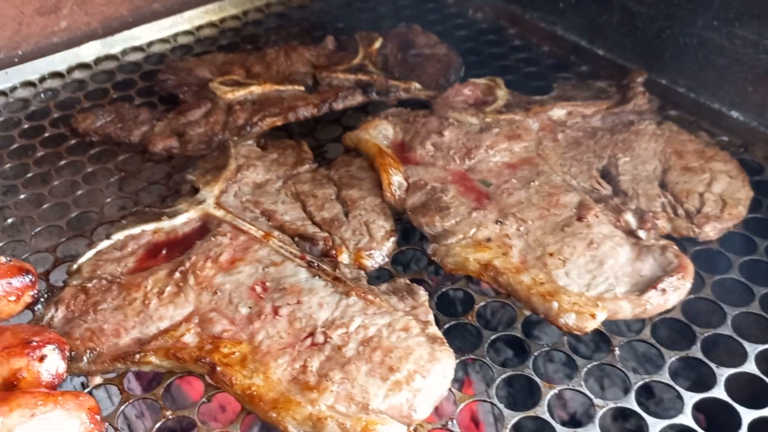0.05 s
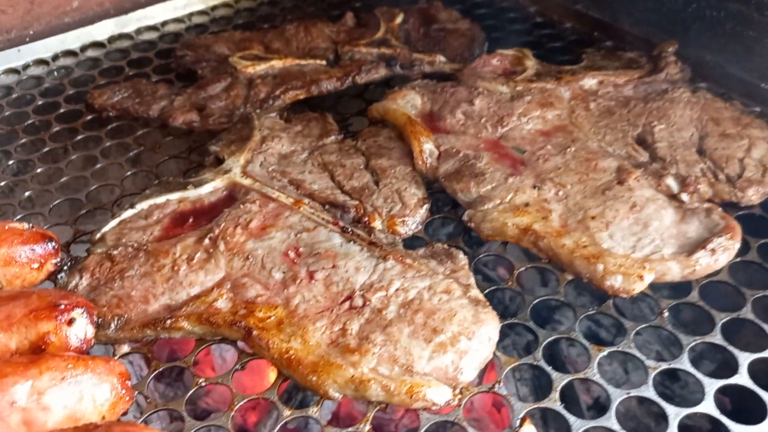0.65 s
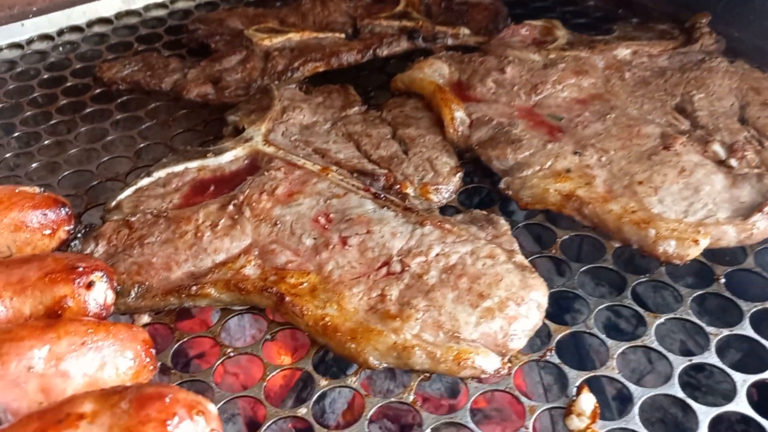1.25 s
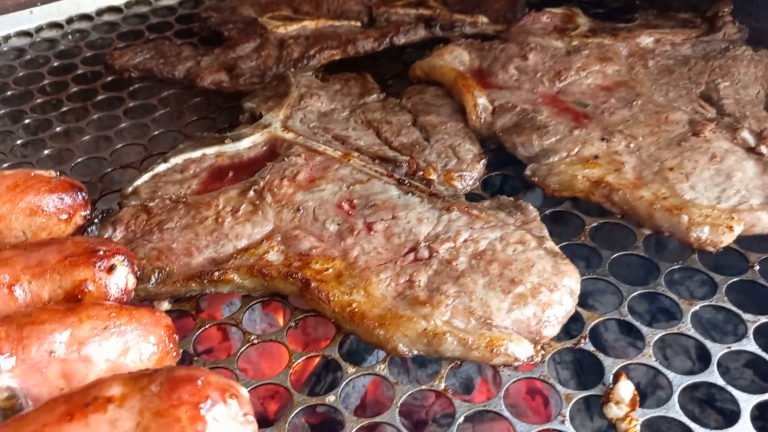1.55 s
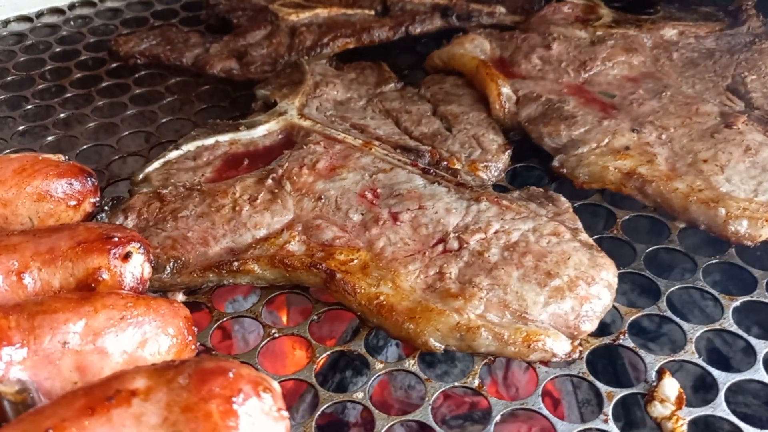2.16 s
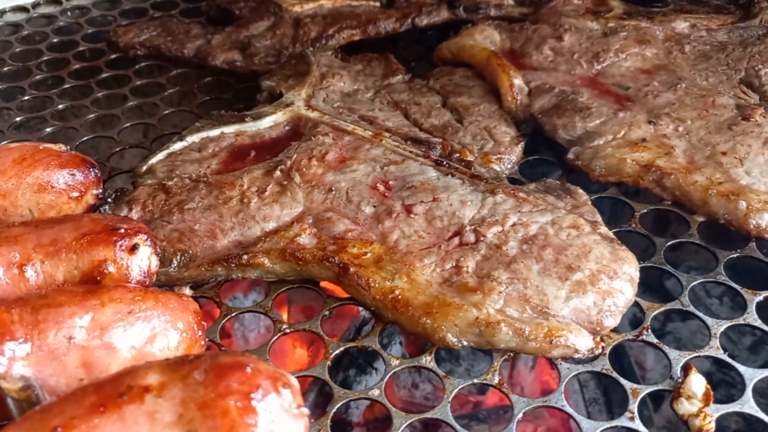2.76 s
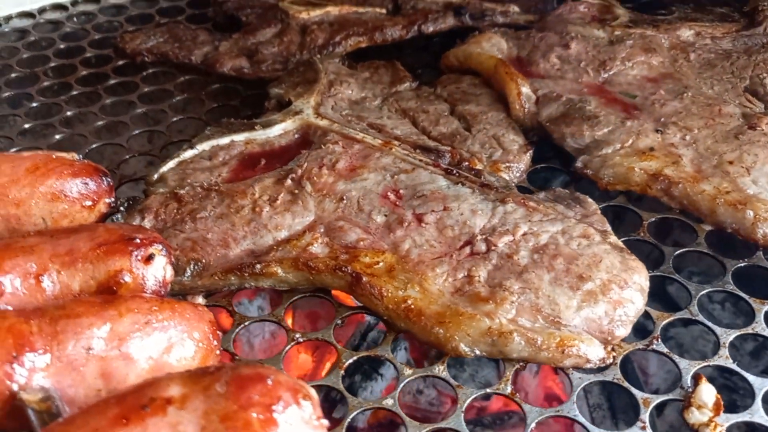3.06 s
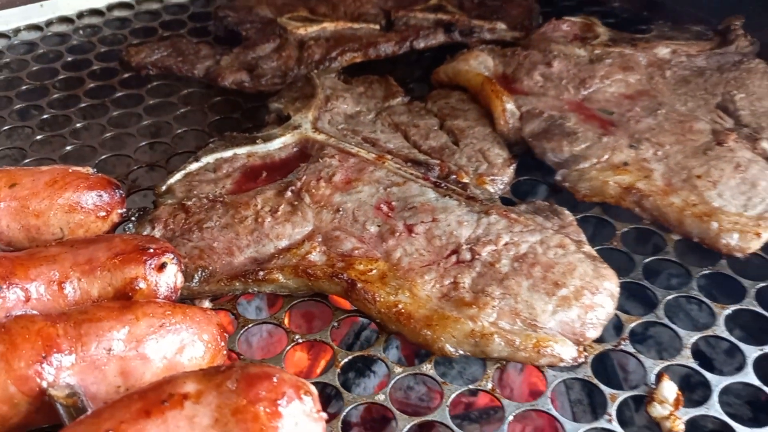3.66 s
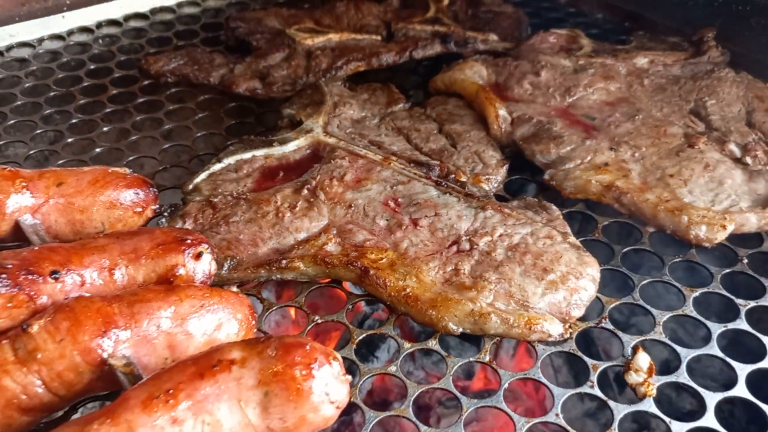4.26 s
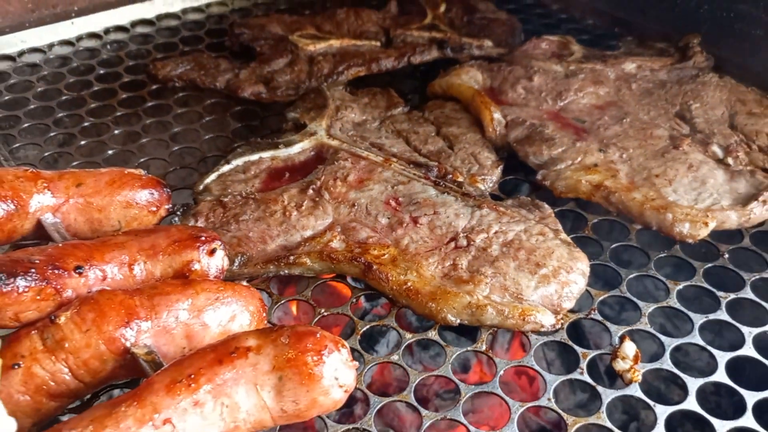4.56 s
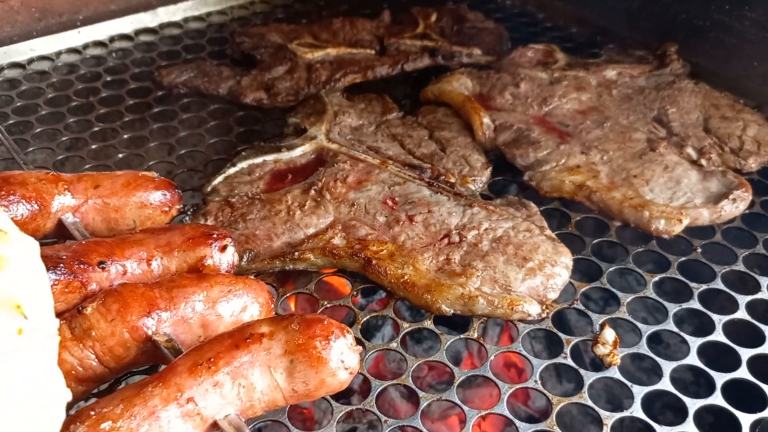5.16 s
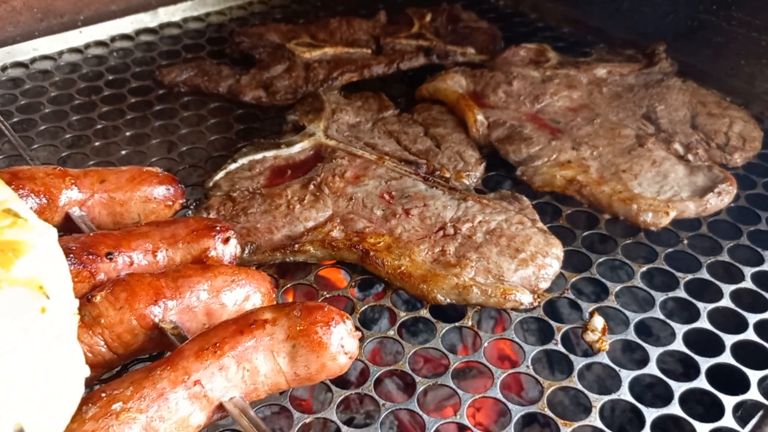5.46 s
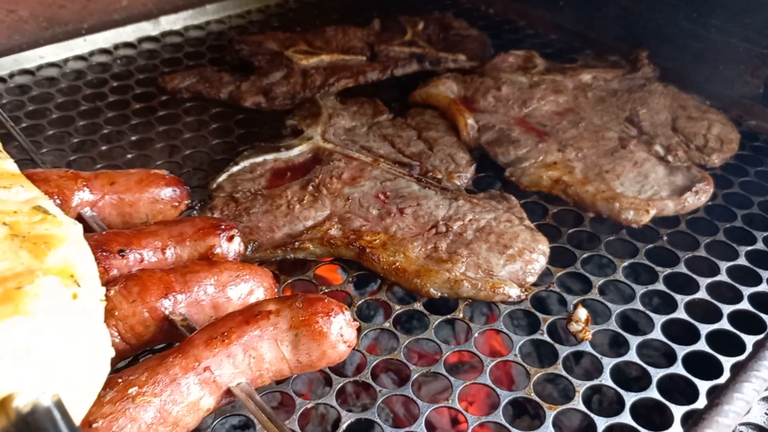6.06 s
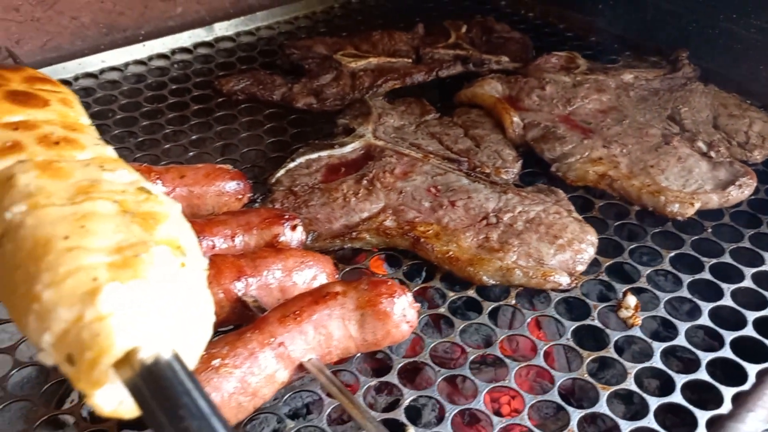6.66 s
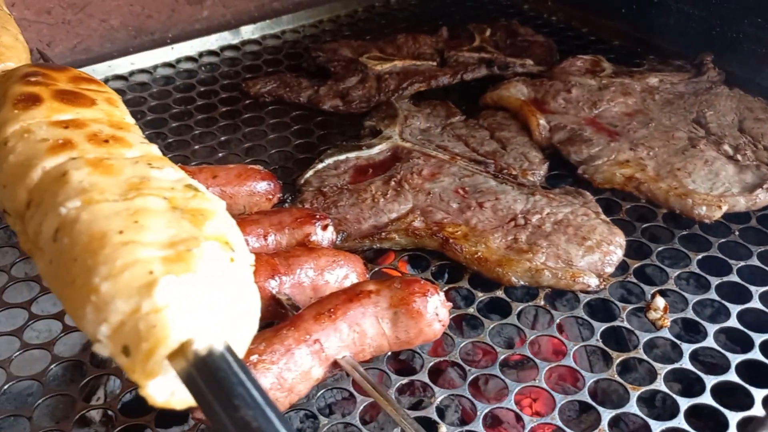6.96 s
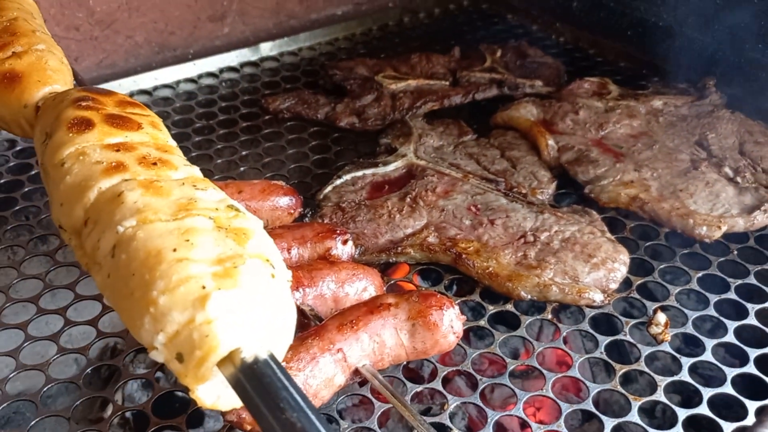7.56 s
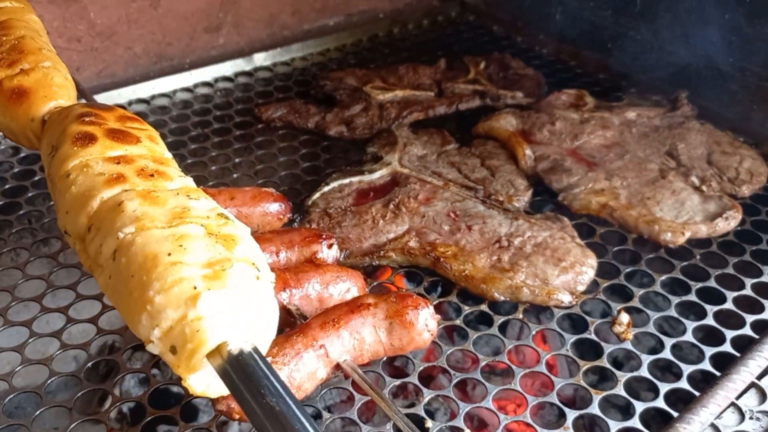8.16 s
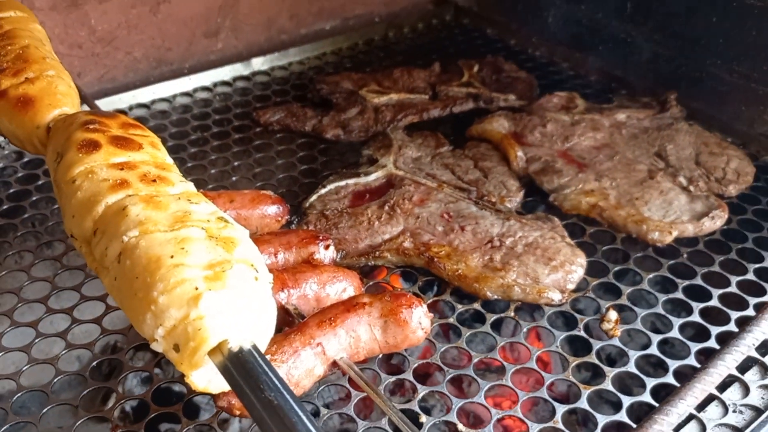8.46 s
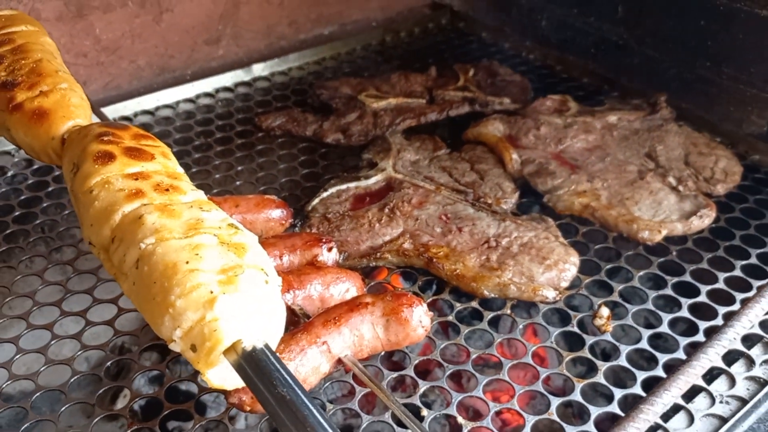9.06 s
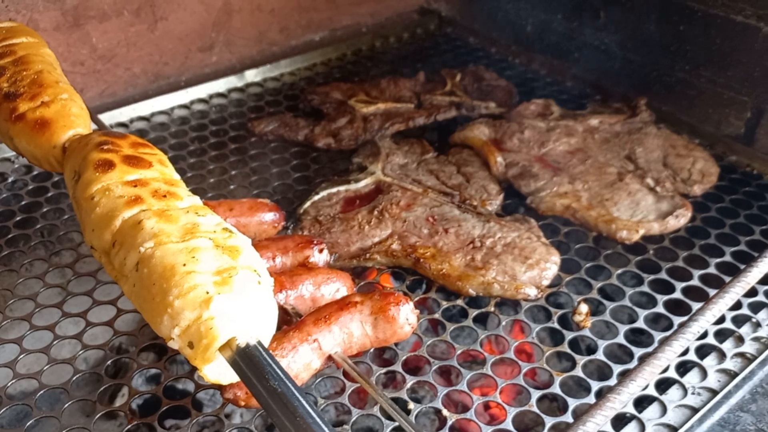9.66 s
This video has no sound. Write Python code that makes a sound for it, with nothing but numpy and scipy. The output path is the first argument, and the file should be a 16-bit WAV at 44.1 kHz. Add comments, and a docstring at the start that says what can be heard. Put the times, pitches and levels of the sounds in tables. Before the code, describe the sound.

Meat fizzes and crackles steadily over hot coals while fat spits in sharp snaps, with a faint outdoor rumble underneath.

```python
"""Steaks and sausages sizzle close by on a perforated steel grill over charcoal. Juice boils in countless tiny
bursts, fat spits in sharp pops, drips hiss on the coals, and the firebox walls scatter it all. Burning fat
flutters and flares; the biggest pops push air against the left microphone in soft thumps. A faint rumble, open
air, a low drone and mains hum lie underneath."""
import sys
import numpy as np
from scipy import signal
from scipy.fft import rfft, irfft, next_fast_len
from scipy.io import wavfile
from scipy.ndimage import map_coordinates

SR = 44100
rng = np.random.default_rng(int(sys.argv[2]) if len(sys.argv) > 2 else 0)


def to_wav(sig):
    """Store sig (one row per channel, or 1-D mono) as 16-bit WAV at the path in sys.argv[1].

    Samples outside -1..1 are clipped; the rate is SR.
    """
    pcm = np.clip(np.atleast_2d(sig), -1, 1) * 32767
    pcm = np.round(pcm).astype(np.int16)
    wavfile.write(sys.argv[1], SR, pcm.T)  # frames by channels


N = 437472

# Loudness curves. Each row: time in seconds, relative level in dB.
FIZZ_LEVEL_DB = [(0.0, -47.5), (0.47, -47.5), (0.83, -48), (2.68, -43), (3.34, -47), (3.81, -46),
                 (4.5, -50), (4.78, -49), (4.92, -43), (5.19, -43), (5.38, -44), (6.41, -47.5),
                 (6.8, -48.5), (7.02, -45.5), (8.26, -52), (8.98, -48), (9.25, -54), (9.92, -54)]  # juice boiling on the meat
FRYING_LEVEL_DB = [(0.0, -53), (1.57, -56), (1.77, -53.5), (2.87, -51.5), (3.12, -56.5), (3.42, -55.5),
                   (3.84, -53.5), (4.61, -54.5), (4.78, -55.5), (4.94, -48.5), (5.55, -50.5), (6.21, -54.5),
                   (6.71, -55), (7.02, -54), (8.26, -54), (9.2, -54), (9.36, -55), (9.92, -55.5)]  # hiss under the meat
FLAME_LEVEL_DB = [(0, -68.5), (1.3, -74), (1.7, -66), (2.6, -65.5), (3.1, -70), (3.7, -66), (4.3, -66.5),
                  (4.6, -74), (5.6, -69), (6.3, -85), (8.6, -68), (9.92, -83)]
RUMBLE_LEVEL_DB = [(0, -62.5), (.5, -65.5), (.75, -57), (1, -71.5), (1.15, -60), (1.75, -55), (2.05, -67.5),
                   (2.4, -59), (2.62, -69), (2.8, -57), (3.1, -56.5), (3.55, -67.5), (3.72, -53.5),
                   (3.95, -67.5), (6.9, -71.5), (7.68, -60.5), (8, -70.5), (9.92, -69.5)]
DRONE_LEVEL_DB = [(0.0, -65), (0.87, -64), (0.96, -72), (1.19, -58), (1.78, -49), (2.03, -68), (2.46, -58),
                  (2.5, -81), (2.82, -52.5), (2.88, -77), (3.2, -59), (3.5, -89)]
# Noise spectra. Each row: frequency in Hz, relative density in dB.
FIZZ_SPECTRUM = [(300, -50), (1000, -25), (2400, -19), (3100, -15), (4000, -10), (5400, -11), (6700, -7.5),
                 (8200, -12), (9500, -7.5), (10800, -6), (11900, -1), (13500, 0), (15700, -1.3)]
FRYING_SPECTRUM = [(200, -32), (700, -18.5), (1000, -9), (1250, -4.5), (2050, -1.5), (2500, -2), (3100, -4),
                   (4000, 2), (5400, -2.5), (6700, -1.5), (8200, -5.5), (12500, -4.5), (15700, -10.5)]
FLAME_SPECTRUM = [(120, -5), (250, -7.5), (400, -8.5), (580, 0), (750, -2), (1050, -1.5), (1500, -11),
                  (3000, -16.5)]
RUMBLE_SPECTRUM = [(25, -67), (40, -11), (52, -16), (68, 5), (90, -9.5), (115, 5), (140, -13.5), (180, -14),
                   (300, -24.5), (900, -70)]
AIR_SPECTRUM = [(30, -29), (60, -5), (110, -2), (160, -2), (250, 0), (400, -4.5), (700, -13.5), (1500, -21),
                (5000, -33)]
SNAP_SPECTRUM = [(300, -42), (1200, -24), (2500, -19), (4200, -11), (5300, -11), (6700, -8), (8300, -11),
                 (10800, -5), (13300, 0), (15700, -.5)]  # bright part of a pop
BODY_SPECTRUM = [(100, -21), (350, -11.5), (700, -15.5), (1200, 0.5), (1600, -7.5), (2100, 3.5), (2500, -1),
                 (3000, -0.5), (4100, 3), (7000, -0.5), (10000, -6), (16000, -10.5)]  # dull part of a pop
STEAM_SPECTRUM = [(150, -1), (400, -7), (650, -14), (920, -1.5), (1300, 4), (1900, 4.5), (2600, 1),
                  (4000, 4), (7000, 0), (8500, -1), (14000, 5), (16000, -11)]
# Mains hum. Each row: frequency in Hz, rms level in dB.
HUM_PARTIALS = [(119.8, -74), (240, -78), (480.5, -83.5)]
# Loudest spits of fat. Each row: start in seconds, relative snap and body levels in dB,
# snap's left-over-right in dB, t60 in seconds.
LOUD_POPS = [(0.0416, -22.5, -61, -4, 0.032), (0.1207, -30, -44.5, 0, .049), (0.412, -20.5, -63, -1, .025),
             (1.047, -26, -46.5, 2, 0.069), (1.1795, -22.5, -57, 1, 0.091), (1.263, -26.5, -52, 1, 0.074),
             (1.5331, -27, -68, -1, .068), (1.6242, -20.5, -56, 1, .037), (1.712, -19.5, -39, 1, 0.022),
             (2.0888, -27, -46, -1, 0.035), (2.5438, -13.5, -46, 1, .04), (2.578, -21, -47.5, -4, 0.064),
             (2.6868, -12, -47.5, -1, 0.03), (2.7918, -19, -58, 0, 0.034), (3.033, -7, -48, 0, 0.032),
             (3.3792, -13, -40, 0, 0.04), (3.5594, -14, -52, 1, 0.031), (3.6493, -16.5, -44.5, 3, 0.065),
             (3.7529, -24, -47.5, 1, 0.17), (3.8515, -22.5, -50, 2, 0.17), (4.0038, -20, -55, -1, 0.048),
             (4.0954, -23.5, -44, 0, 0.05), (4.145, -15.5, -50, -2, 0.032), (4.221, -29, -36.5, -1, 0.033),
             (4.3111, -32, -40.5, 4, 0.054), (4.7142, -22, -60, -1, 0.055), (4.9921, -20.5, -48, 4.5, .064),
             (5.0522, -23, -40, 6, 0.071), (5.2893, -18.5, -40, 1, 0.034), (5.3751, -18.5, -40, 3, 0.048),
             (5.5336, -25, -46, 7, 0.098), (6.0242, -8, -38, 0.5, 0.036), (6.061, -24, -40.5, 4, 0.043),
             (6.2422, -12, -35.5, 4, 0.032), (6.5799, -20, -61, 2, 0.06), (6.895, -43, -42, -1, .054),
             (7.1252, -14.5, -33.5, -1, 0.047), (7.6542, -31, -48.5, 4, 0.16),
             (8.4702, -21.5, -47, -1, 0.099), (8.7517, -8.5, -45, 1.5, 0.037),
             (9.1753, -29, -38.5, 7, 0.027), (9.2609, -31, -45, 3, 0.14), (9.641, -9, -48, 1.5, 0.03)]
# Flaring fat, then the low knock of the last big pop.
# Each row: start in seconds, level in dB, centre in Hz, t60 in seconds.
WHOOMPHS = [(2.37, -53, 229, 0.64), (3.64, -59.5, 210, 0.62), (5.08, -59, 230, 0.7),
            (7.13, -61.5, 454, 1.3), (9.26, -58, 260, .3), (9.64, -51, 300, 0.17)]
# Whoomph spectrum. Each row: multiple of the centre frequency, relative density in dB.
WHOOMPH_SHAPE = [(.3, -25), (.75, 3), (1.3, -3.5), (3, -7), (8, -38), (30, -70)]
# Air puffs from the biggest pops against the left microphone. Each row: start in seconds, level in dB,
# frequency in Hz.
AIR_PUFFS = [(3.036, -37, 80), (6.028, -26.5, 76.6), (9.645, -39.5, 90)]
# Drips on the coals. Each row: start in seconds, level in dB, rise and t60 in seconds.
COAL_DRIPS = [(4.753, -36, 0.013, 0.76), (8.955, -33, 0.048, 0.76)]

TIME_S = np.arange(N) / SR


def amp(db):
    """Decibels to gain."""
    return 10 ** (np.asarray(db) / 20)


def unit(x):
    """Scale to rms 1."""
    return x / np.sqrt(np.mean(x ** 2) + 1e-20)


def curve(rows):
    """(time, value) rows to one value per sample."""
    return np.interp(TIME_S, *np.transpose(rows))


def wobble(knots_per_s):
    """Smooth random curve."""
    knots = rng.standard_normal(4096)
    coarse = np.arange(0, N + 32, 32)
    smooth = map_coordinates(knots, [coarse * knots_per_s / SR], mode="mirror")
    return np.interp(np.arange(N), coarse, smooth)


def surge(start_s, db, rise_s, t60_s):
    """Envelope: fast rise, exponential decay."""
    age_s = np.maximum(TIME_S - start_s, 0)
    return amp(db - 60 * age_s / t60_s) * (1 - np.exp(-age_s / rise_s))


def panned(db):
    """Stereo gains, left over right by db."""
    return amp([[db / 2], [-db / 2]])


def coloured(x, spectrum):
    """Minimum-phase filter through (Hz, dB) points; white noise keeps its power."""
    size = 4096
    hz, db = np.transpose(spectrum)
    bin_hz = np.fft.rfftfreq(size, 1 / SR)
    gain = unit(amp(np.interp(np.log(bin_hz + 1), np.log(hz), db)))
    cepstrum = irfft(np.log(gain + 1e-6))
    cepstrum[1:size // 2] *= 2
    cepstrum[size // 2 + 1:] = 0
    impulse = irfft(np.exp(rfft(cepstrum)))
    return signal.oaconvolve(x, impulse[None], axes=1)[:, :N]


def rush(spectrum, side_db):
    """Stereo noise, rms 1, mostly alike in both ears."""
    mid, side = coloured(rng.standard_normal((2, N)), spectrum)
    return unit(np.array([mid + amp(side_db) * side, mid - amp(side_db) * side]))


def patchy(x, depth_db, width_hz, per_s):
    """Patches of the spectrum swell and sink at random; rms 1."""
    hz, t, frames = signal.stft(x, SR, nperseg=256)
    grid = np.meshgrid(hz / width_hz, t * per_s, indexing="ij")
    field = map_coordinates(rng.standard_normal((48, 1024)), grid, mode="mirror")
    gain = amp(depth_db * np.minimum(field, 2.3))
    return unit(signal.istft(frames * gain, SR, nperseg=256)[1][:, :N])


def firebox(t60_s, echo_db, spread_s=0.0004):
    """Stereo path from one spot on the grill: direct click, earlier on one side, then wall echoes."""
    t = np.arange(SR // 12) / SR
    echoes = rng.standard_normal((2, len(t))) * amp(-60 * t / t60_s) * (t > spread_s)
    path = amp(echo_db) * echoes / np.linalg.norm(echoes[0])
    lag = int(rng.uniform(-1, 1) * spread_s * SR)
    path[0, max(lag, 0)] += 1
    path[1, max(-lag, 0)] += 1
    return path / np.linalg.norm(path[0])


def boiling(per_s, spread_db, swell_db, swells_per_s, t60_s, echo_db, spots):
    """Bubbles burst at several spots; each swells by itself and moves every half second. Rms 1."""
    out, stay = np.zeros((2, N + SR)), SR // 2
    for _ in range(spots):
        at = np.flatnonzero(rng.random(N) < per_s / spots / SR)
        size_db = spread_db * np.minimum(rng.standard_normal(N), 1)
        size_db += swell_db * np.minimum(wobble(swells_per_s), 2)
        bursts = np.zeros(N)
        bursts[at] = rng.choice([-1, 1], N)[at] * amp(size_db[at])
        for start in range(0, N, stay):
            path = firebox(t60_s, echo_db)
            heard = signal.fftconvolve(bursts[None, start:start + stay], path, axes=1)
            out[:, start:start + heard.shape[1]] += heard
    return unit(out[:, :N])


def sizzle():
    """Juice fizzes in short spurts, with dry ticks nearby and louder, echoing crackle."""
    fizz = boiling(20000, spread_db=5.5, swell_db=-1.5, swells_per_s=48, t60_s=0.022, echo_db=1, spots=4)
    spurts = patchy(fizz, depth_db=1, width_hz=2600, per_s=73)
    ticks = boiling(36, spread_db=8, swell_db=1, swells_per_s=6, t60_s=0.015, echo_db=-6, spots=3)
    crackle = boiling(83, spread_db=-1, swell_db=0.5, swells_per_s=5.1, t60_s=0.035, echo_db=11, spots=4)
    crackle = patchy(crackle, depth_db=3, width_hz=1990, per_s=17)
    gain = amp(curve(FIZZ_LEVEL_DB) + 4)
    near = coloured(gain * (spurts + amp(-9) * ticks), FIZZ_SPECTRUM)
    return near + coloured(gain * crackle, SNAP_SPECTRUM)


def frying():
    """Duller hiss of boiling under the meat."""
    hiss = boiling(6000, spread_db=7.5, swell_db=3.5, swells_per_s=45, t60_s=0.031, echo_db=0.5, spots=6)
    hiss = patchy(hiss, depth_db=0.9, width_hz=880, per_s=9)
    return coloured(amp(curve(FRYING_LEVEL_DB) + 5.5) * hiss, FRYING_SPECTRUM) * panned(-1.65)


def flames():
    """Small flames flutter where fat burns on the coals."""
    level_db = curve(FLAME_LEVEL_DB) + 3.6 * wobble(9.7)
    return amp(level_db) * rush(FLAME_SPECTRUM, side_db=-7.5) * panned(-3.3)


def rumble():
    """Low noise in swells, with a quick waver."""
    level_db = curve(RUMBLE_LEVEL_DB) + 1.5 * wobble(8)
    return amp(level_db) * rush(RUMBLE_SPECTRUM, side_db=-7.5) * panned(4.9)


def open_air(level_db=-68):
    """Faint, nearly steady outdoor rush."""
    return amp(level_db + 0.2 * wobble(5.2)) * rush(AIR_SPECTRUM, side_db=-4) * panned(2)


def mains_hum():
    """Electric hum, slightly unsteady in level and phase."""
    hum = np.zeros(N)
    for hz, db in HUM_PARTIALS:
        peak = np.sqrt(2) * amp(db + 2.4 * wobble(1.83))
        hum += peak * np.sin(2 * np.pi * hz * TIME_S + 0.28 * wobble(2.95))
    return hum * panned(1)


def drone(start_hz=63.2, climb_hz_per_s=2.05, fade_db_per_s=14):
    """Wavering low tone, like a far engine; creeps up in pitch, fades after its last swell."""
    hz = start_hz + climb_hz_per_s * TIME_S
    phase = 2 * np.pi * np.cumsum(hz) / SR + 0.12 * wobble(14)
    fade_db = fade_db_per_s * np.maximum(TIME_S - DRONE_LEVEL_DB[-1][0], 0)
    level_db = curve(DRONE_LEVEL_DB) - fade_db + 1.1 * wobble(59)
    return amp(level_db) * np.sqrt(2) * np.sin(phase) * panned(3.4)


def spit(t, t60_s, rise_s, spiky_db, tail_db, tail_t60_s, crack_db):
    """A blister bursts with one hard crack, tears on in smaller ones, and the walls answer."""
    tears = np.clip(rng.standard_normal((2, len(t))), -2, 2)
    tears = np.repeat(tears, 16, axis=1)[:, :len(t)]
    decay = amp(-60 * t / t60_s) + amp(tail_db - 60 * t / tail_t60_s)
    envelope = (1 - np.exp(-t / rise_s)) * decay
    sound = rng.standard_normal((2, len(t))) * amp(spiky_db * tears) * envelope
    arrival = rng.integers(24, 56, 2)  # samples, per channel
    sound[[0, 1], arrival] += amp(crack_db)
    return sound


def pops(rows):
    """Fat spits: bright snap, dull body. In big pops the first crack stands out less from the tearing."""
    t = np.arange(SR // 5) / SR
    snaps, bodies = np.zeros((2, 2, N + SR))
    for start_s, snap_db, body_db, pan_db, t60_s in rows:
        start = round(start_s * SR)
        crack_db = np.interp(snap_db, [-18, -8], [16.5, 11])
        snap = spit(t, t60_s, 0.00049, spiky_db=4.5, tail_db=-16.5, tail_t60_s=0.15, crack_db=crack_db)
        body = spit(t, t60_s, 0.00058, spiky_db=2, tail_db=-17, tail_t60_s=0.27, crack_db=7)
        snaps[:, start:start + len(t)] += amp(snap_db - 5.5) * panned(pan_db) * snap
        bodies[:, start:start + len(t)] += amp(body_db + 7) * body
    return coloured(snaps[:, :N], SNAP_SPECTRUM) + coloured(bodies[:, :N], BODY_SPECTRUM)


def small_spits(per_s=6, mean_t60_s=0.039, spread_db=2.5):
    """Rows for lesser pops at random times; their strength follows the fizz."""
    gap_draw, decay_draw = rng.random((200, 2)).T
    snap_db, body_db, pan_db = spread_db * np.clip(rng.standard_normal((200, 3)), -1.5, 1.5).T
    start_s = np.cumsum(-np.log(1 - gap_draw)) / per_s
    fizz_db = np.interp(start_s, *np.transpose(FIZZ_LEVEL_DB))
    t60_s = mean_t60_s * (0.5 + decay_draw)
    rows = np.column_stack([start_s, fizz_db + 15 + snap_db, fizz_db - 5.5 + body_db, pan_db, t60_s])
    return rows[start_s < N / SR].tolist()


def whoomphs(rise_s=0.011):
    """Low whoomphs of flaring fat, and the short low knock of the last big pop."""
    out = np.zeros((2, N))
    for start_s, db, centre_hz, t60_s in WHOOMPHS:
        spectrum = [(centre_hz * multiple, density_db) for multiple, density_db in WHOOMPH_SHAPE]
        out += surge(start_s, db, rise_s, t60_s) * rush(spectrum, side_db=-12)
    return out * panned(2.1)


def puffs(t60_s=0.067, rise_s=0.0013, push_hz=150, push_t60_s=0.027):
    """The biggest pops push air against the left microphone: a short soft thump."""
    out, t = np.zeros((2, N + SR)), np.arange(SR // 4) / SR
    for start_s, db, hz in AIR_PUFFS:
        swing = np.sin(2 * np.pi * hz * t) * amp(-60 * t / t60_s)
        push = 0.7 * np.sin(2 * np.pi * push_hz * t) * amp(-60 * t / push_t60_s)
        out[0, round(start_s * SR):][:len(t)] += amp(db) * (swing + push) * (1 - np.exp(-t / rise_s))
    return out[:, :N]


def drips():
    """A drip lands on a coal and flashes to steam."""
    flash = sum(surge(*drip) for drip in COAL_DRIPS)
    steam = boiling(8000, spread_db=-2, swell_db=1, swells_per_s=75, t60_s=0.054, echo_db=4, spots=3)
    return coloured(flash * steam, STEAM_SPECTRUM) * panned(-0.17)


def scene():
    """Grill and background, in stereo."""
    grill = sizzle() + frying() + drips() + flames() + whoomphs() + puffs()
    background = drone() + rumble() + open_air() + mains_hum()
    return grill + background + pops(LOUD_POPS + small_spits())


def record(dry):
    """Cut the deepest bass and everything above the band limit."""
    low_hz, top_hz = 48, 15760
    thinned = signal.sosfilt(signal.butter(4, low_hz, "high", fs=SR, output="sos"), dry)
    size = next_fast_len(N + SR // 2)
    in_band = np.fft.rfftfreq(size, 1 / SR) < top_hz
    return irfft(rfft(thinned, size) * in_band, size)[:, :N]


dry = scene()
out = record(dry)
to_wav(out)
```